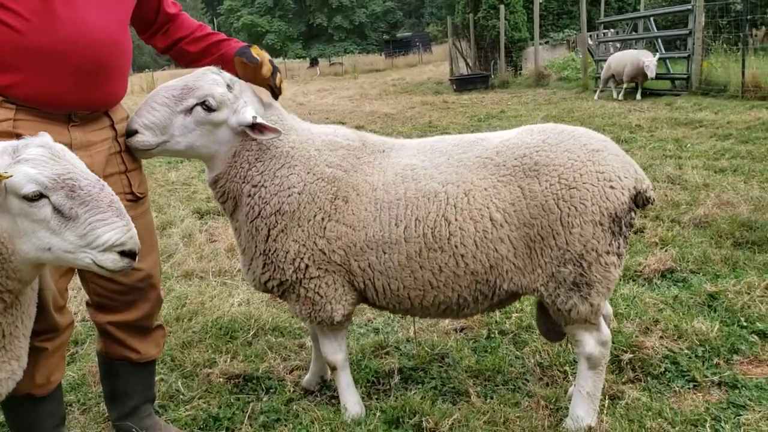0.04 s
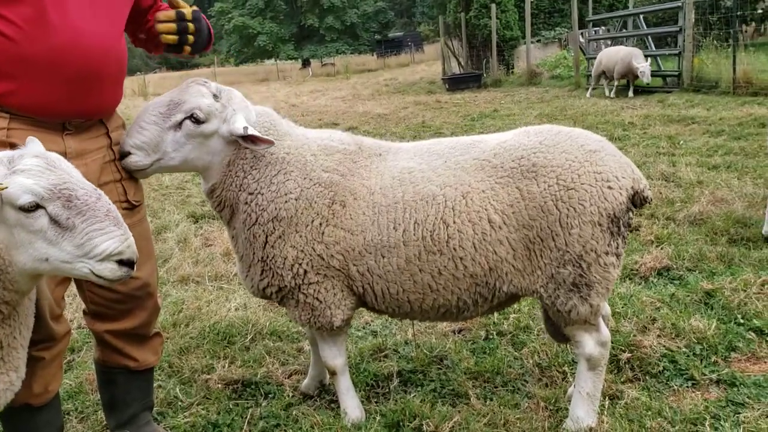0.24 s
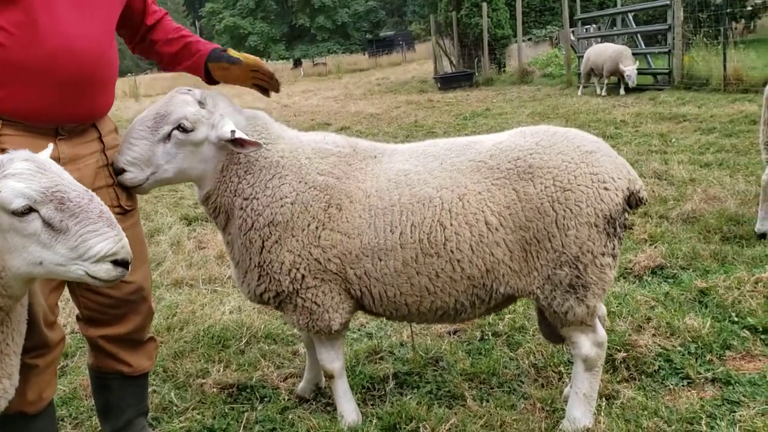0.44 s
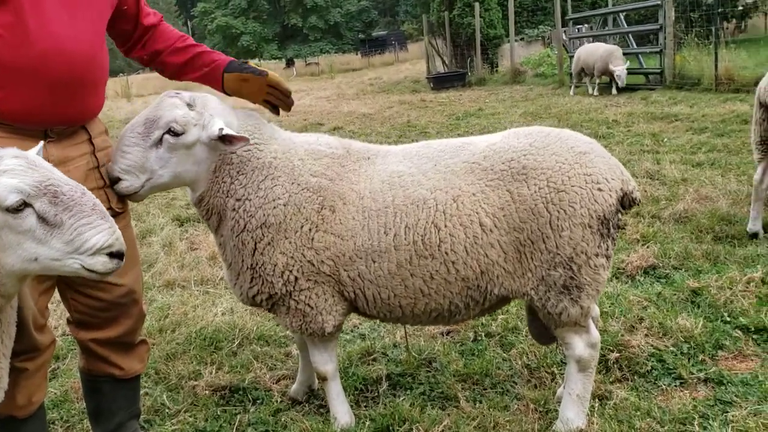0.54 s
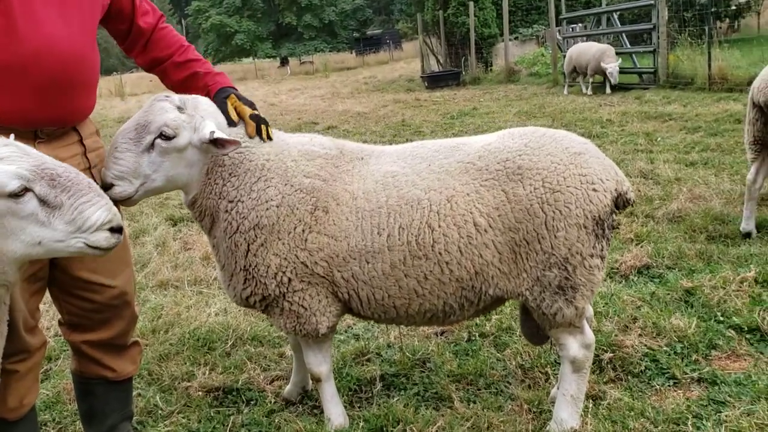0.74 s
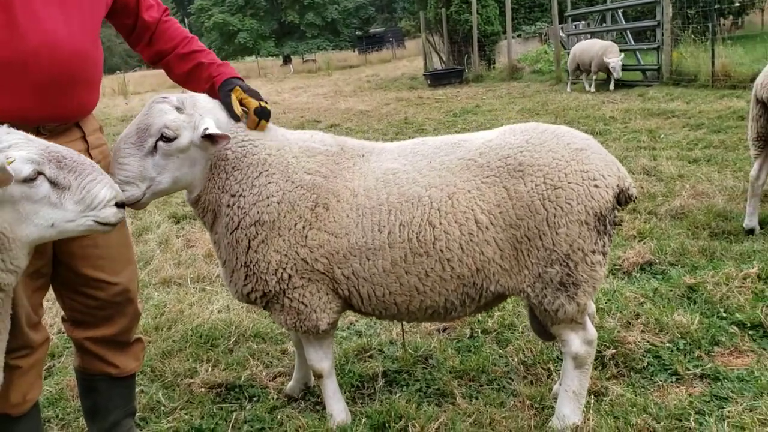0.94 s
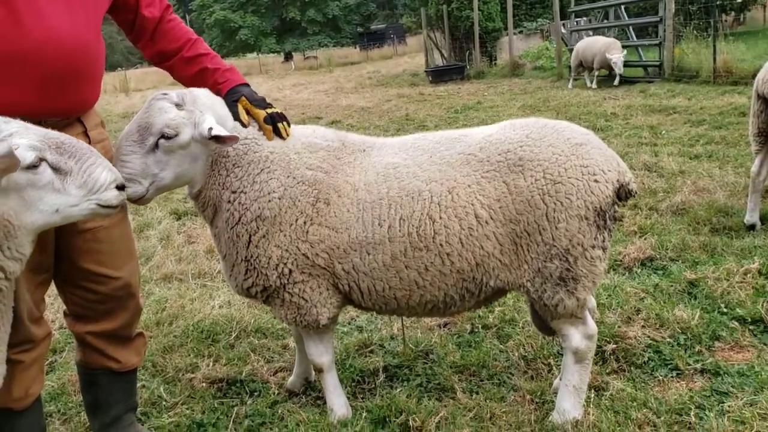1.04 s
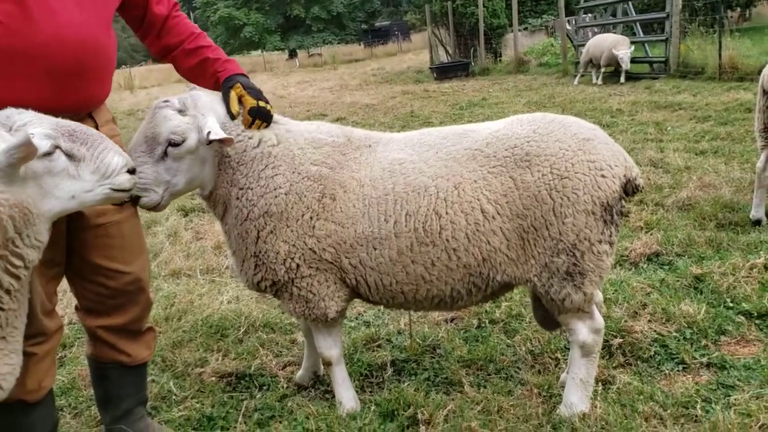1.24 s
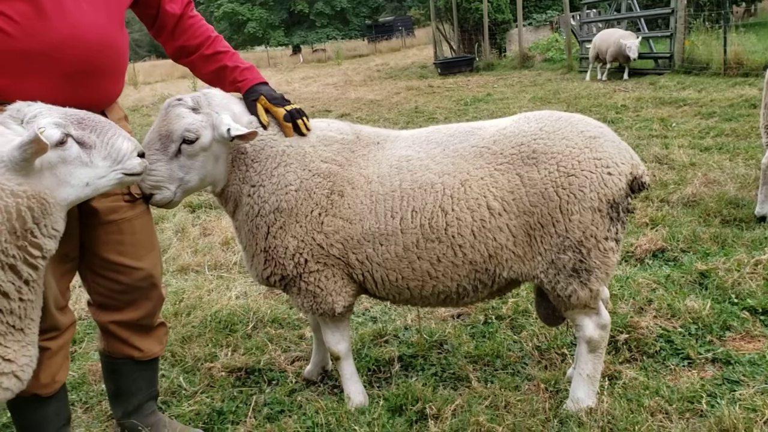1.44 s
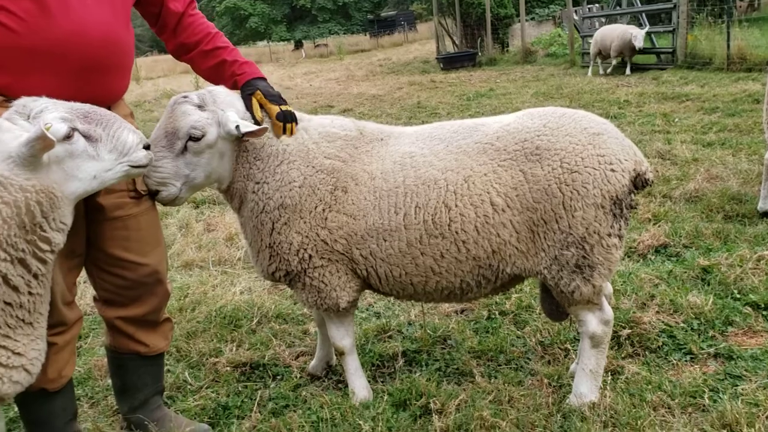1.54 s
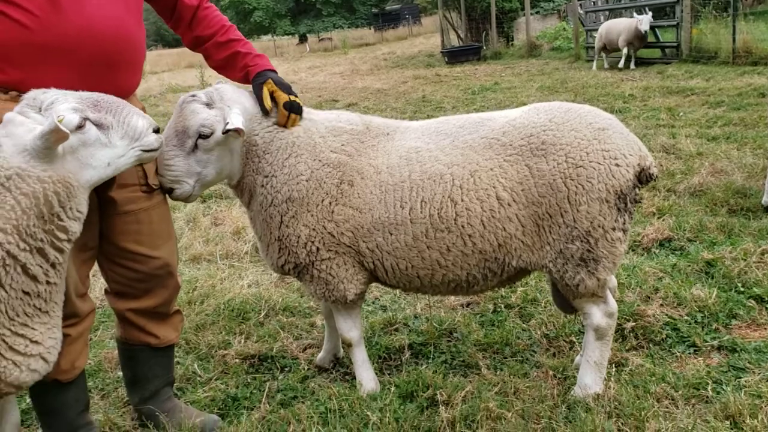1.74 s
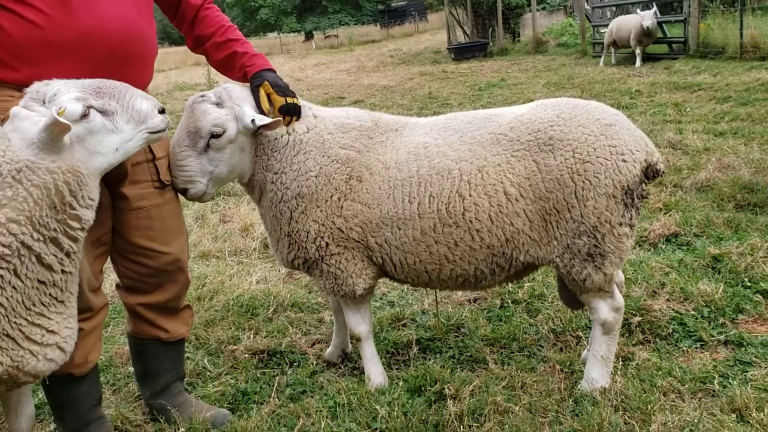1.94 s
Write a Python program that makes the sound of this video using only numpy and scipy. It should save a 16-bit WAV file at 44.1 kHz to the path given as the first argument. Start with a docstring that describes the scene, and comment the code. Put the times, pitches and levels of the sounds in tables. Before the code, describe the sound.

A sheep snorts twice, close up, with breathy nasal puffs over a faint low outdoor rumble.

```python
"""Pasture, two ports close to sheep. From the start a low rumble with two wavering tones drones far off under
the faint hiss of open air: coloured noise. A sheep snorts at about 0.15 s and again at 1.35 s: bursts of
turbulent noise ring the nose resonances, and slow breath trails off after each. Between and after them fall
faint nostril whistles and soft low stirs (narrow noise swells) and small ticks (dying sines)."""
import sys
import numpy as np
from scipy import signal
from scipy.fft import rfft, irfft
from scipy.io import wavfile

SR = 44100
rng = np.random.default_rng(int(sys.argv[2]) if len(sys.argv) > 2 else 0)


def pcm_store(signal):
    """Save signal as 16-bit PCM."""
    levels = np.round(np.clip(np.atleast_2d(signal), -1, 1) * 32767)
    wavfile.write(sys.argv[1], SR, levels.astype(np.int16).T)


def convert_level_to_amplitude(level_db):
    """Map a level in decibels to its linear amplitude factor."""
    exponent = np.asarray(level_db, float) / 20
    return 10 ** exponent


N = 88200  # samples, 2 s
F = np.fft.rfftfreq(N, 1 / SR)  # Hz
T = np.arange(N) / SR  # s


def read(table):
    """A (frequency [Hz], value) table at every frequency, interpolated over log frequency."""
    hz, value = np.array(table, float).T
    return np.interp(np.log(F + 1), np.log(hz + 1), value)


def ring(hz, width_hz):
    """Response of one resonance, gain 1 at the centre."""
    s = 1j * F
    return s * width_hz / (s * s + s * width_hz + hz * hz)


def noise(shape):
    """Noise of a given spectral shape, rms 1."""
    x = irfft(rfft(rng.standard_normal(N)) * shape, N)
    return x / x.std()


def walk(rate_hz):
    """Slow random drift, rms 1."""
    return noise(1 / (1 + (F / rate_hz) ** 2))


def noise_swells(rows, width_hz):
    """Short soft swells of narrow noise; rows: (time [s], centre [Hz], level [dB], length [s])."""
    out = np.zeros(N)
    for time_s, hz, level_db, length_s in rows:
        envelope = np.exp(-2 * ((T - time_s) / length_s) ** 2)
        out += convert_level_to_amplitude(level_db) * envelope * noise(ring(hz, width_hz) ** 2)
    return out


def ports(shared, unshared, balance, phase, likeness):
    """Two ports hear one sound with their own level and phase, and an unshared part of opposite sign."""
    like = np.clip(read(likeness), 0, 1)
    common = rfft(shared) * np.sqrt((1 + like) / 2)
    opposed = rfft(unshared) * np.sqrt((1 - like) / 2)
    tilt = convert_level_to_amplitude(read(balance) / 2) * np.exp(0.5j * phase)  # half of the difference to each port
    left = irfft((common + opposed) * tilt, N)
    right = irfft((common - opposed) / tilt, N)
    return np.array([left, right])


def far_air():
    """Far rumble and air hiss: coloured noise swelling slowly as one, with two wavering tones in the rumble."""
    # air colour: (frequency [Hz], density [dB, relative])
    air_colour = [(20, -47), (40, -16), (60, -4.5), (85, -6.5), (130, -6.5), (190, -16), (260, -24.5),
                  (550, -34), (1300, -37.5), (2200, -44), (4000, -38.5), (9500, -41), (13000, -44),
                  (16000, -36)]
    # left over right: (frequency [Hz], level [dB])
    air_balance = [(60, 2), (200, -4), (700, 2), (3000, -15.5), (8000, -3.5), (15000, -5.5)]
    # likeness of the ports: (frequency [Hz], likeness [0-1])
    air_like = [(30, 0.33), (80, 0.92), (300, 0.78), (1400, 0.13), (8000, 0.037)]
    # tones: (centre [Hz], width of each of two cascaded resonances [Hz], level [dB, relative])
    drone_tones = [(84.2, 15.6, -2.5), (223.3, 3.36, -16)]
    # overall gain: (time [s], level [dB])
    air_level = [(0.0, -65), (0.06, -60), (2.0, -61.5)]
    gain_db, swell_db, swell_rate_hz = -0.5, 1.67, 1.5

    octave = np.log2(F + 1)
    edges = np.clip(octave - 4, 0, 1) * np.clip(15 - octave, 0, 1)  # fades below 31 Hz and above 16.4 kHz
    colour = convert_level_to_amplitude(read(air_colour))
    gain = convert_level_to_amplitude(gain_db + swell_db * walk(swell_rate_hz))
    shared, unshared = [gain * irfft(rfft(noise(colour)) * edges, N) for _ in range(2)]
    for hz, width_hz, level_db in drone_tones:
        shared += convert_level_to_amplitude(level_db) * noise(ring(hz, width_hz) ** 2)
    level_db = np.interp(T, *np.array(air_level).T)
    return ports(shared, unshared, air_balance, 0, air_like) * convert_level_to_amplitude(level_db)


def breath_flow(part):
    """Strength of slow breath in one nose part (0 low nose .. 4 throat), dB interpolated over time."""
    # slow breath between puffs: (time [s], level [dB], then offsets for
    # middle [dB], upper [dB], nostril hiss [dB], throat [dB])
    breath_rows = [(0, -58, -4.5, -4.5, -1, 1), (.12, -69.5, -3, -2, -8, 1), (.25, -46.5, -1, -5.5, -11, 3),
                   (.36, -61, 5, -0.5, -15, -1.5), (.46, -59.5, 3.5, -2, 0.5, -2),
                   (.56, -69, 4.5, -5, -5, 10.5), (.78, -78.5, 2.5, 9.5, -1, -11),
                   (.96, -83.5, 5, 2, 11.5, 0), (1.12, -90, 10, 18, 16, 2), (1.27, -71.5, 0, 6.5, 9, -28),
                   (1.45, -52.5, 1.5, -5, -26, 6), (1.54, -56, -1, -2, -4, 2.5),
                   (1.64, -66.5, 4, 2, -2, -1), (1.79, -69.5, 1, 6, -12, 4), (1.83, -66, 1, 5.5, 2.5, 5.5),
                   (2, -67.5, -2.5, 0, -1, 0)]
    times_s = [row[0] for row in breath_rows]
    levels_db = [row[1] + (row[1 + part] if part else 0) for row in breath_rows]
    return convert_level_to_amplitude(np.interp(T, times_s, levels_db))


def puff_flow(part):
    """Strength of the puffs in one nose part: each rises fast and dies away; powers add."""
    # puffs: (time of full rise [s], level [dB], then offsets for
    # middle [dB], upper [dB], nostril hiss [dB], throat [dB]; decay t60 [s])
    puff_rows = [(0.092, -68, 0, 5, 5, -20, 0.9), (0.146, -37.5, 3, 4.5, 7.5, -6, 0.18),
                 (0.161, -36.5, 1, 4.5, 3, 4, 0.15), (0.176, -34, 7, 4, -15, 7, 0.13),
                 (0.199, -39.5, 2.5, -3, -26, 1.5, 0.16), (0.257, -49, -22, 2.5, -2.5, -23, 0.33),
                 (0.815, -59, 4, 7, -3, -1, 0.13), (0.826, -60, -12, -10, -26, 4, 0.5),
                 (1.192, -68.5, 4, 3, -22, -7, 0.51), (1.287, -58, 2, 4, 8, -7, 0.67),
                 (1.341, -40.5, 4.5, 5, 7, -3, 0.095), (1.351, -47.5, 5, 8.5, -10, -10, 0.17),
                 (1.386, -38, 1.5, 1.5, -2, -1, 0.29), (1.427, -34, -1, -2, -1.5, -2, 0.067),
                 (1.481, -48, 2, 0, 1, 1, 0.13), (1.803, -71, 9, 9, -3, 3, 0.2)]
    rise_s = 0.005
    power = np.zeros(N)
    for row in puff_rows:
        level_db = row[1] + (row[1 + part] if part else 0)
        age_s = np.maximum(T - row[0] + rise_s, 0)
        shape = np.minimum(age_s / rise_s, 1) ** 2 * convert_level_to_amplitude(-60 * age_s / row[-1])
        power += (convert_level_to_amplitude(level_db) * shape) ** 2
    return np.sqrt(power)


def nose_air():
    """Turbulent air rings the nose; returns spectra-shaped puffs and breath, each (shared, unshared)."""
    # resonances in five parts: low nose, middle, upper, nostril hiss, throat; each
    # (centre [Hz], width of each of two cascaded stages in a puff [Hz], puff level [dB], breath level [dB])
    nose_parts = [
        [(1097, 73, 1, 1), (1282, 136, -0.5, -7.5), (1534, 356, 2, -2.5), (1857, 110, -1, -9)],
        [(2240, 456, -5.5, -9.5), (2970, 320, -3.5, -7.5), (3306, 250, -6, -9.5), (3681, 242, 3.5, -10),
         (3986, 1370, -7.5, -8.5)],
        [(5020, 190, -13.5, -13), (5710, 900, -8, -13.5), (7460, 750, -12, -13)],
        [(10370, 5600, -29, -25), (11100, 5100, -16, -24.5), (12570, 1400, -9.5, -14.5),
         (14100, 3900, -22, -26)],
        [(358, 210, -20, -22), (642, 164, -14, -32.5), (804, 60, -3, -9.5), (950, 290, -9.5, -15)],
    ]
    turbulence_db, turbulence_hz = 1.6, 120  # flutter common to a part
    wander_db, wander_hz = 1.4, 25  # each resonance also swells and fades alone
    breath_widening = 1.88  # resonances are broader in slow breath
    gain_db, open_hz, open_width_hz = 15.5, 2820, 18700  # wide band passed by the open nostrils

    puffs, breath = np.zeros((2, 2, len(F)), complex)
    for part, resonances in enumerate(nose_parts):
        flutter = convert_level_to_amplitude(turbulence_db * walk(turbulence_hz))
        puff_strength, breath_strength = puff_flow(part), breath_flow(part)
        for hz, width_hz, puff_db, breath_db in resonances:
            wander = flutter * convert_level_to_amplitude(wander_db * walk(wander_hz))
            puff_air = puff_strength * wander * rng.standard_normal((2, N))
            breath_air = breath_strength * wander * rng.standard_normal((2, N))
            puffs += convert_level_to_amplitude(puff_db) * ring(hz, width_hz) ** 2 * rfft(puff_air)
            breath += convert_level_to_amplitude(breath_db) * ring(hz, width_hz * breath_widening) ** 2 * rfft(breath_air)
    nostrils = convert_level_to_amplitude(gain_db) * ring(open_hz, open_width_hz)
    return irfft(puffs * nostrils, N), irfft(breath * nostrils, N)


def nostril_whistles():
    """Breathy nostril whistles, high and low: narrow noise swells."""
    # (time [s], centre [Hz], level [dB], length [s])
    whistle_rows = [(.45, 10200, -72, .03), (1.543, 10100, -62, .014), (.855, 830, -68, .035),
                    (1.834, 1100, -63, .018), (1.877, 1100, -63, .02), (1.945, 1150, -66, .03)]
    return noise_swells(whistle_rows, width_hz=130)


def low_stirs():
    """Soft low stirs, perhaps hooves in the grass: narrow noise swells."""
    # (time [s], centre [Hz], level [dB], length [s])
    stir_rows = [(.49, 310, -71, .03), (1.07, 330, -70, .07)]
    return noise_swells(stir_rows, width_hz=113)


def dry_ticks():
    """Small dry ticks: sines that rise within one cycle and die away exponentially."""
    # (time [s], level [dB], frequency [Hz], decay t60 [s])
    tick_rows = [(.8122, -43, 3650, .03), (1.287, -54, 11000, .008), (1.31, -58, 10000, .008),
                 (1.6602, -37, 1450, .008)]
    out = np.zeros(N)
    for time_s, level_db, hz, t60_s in tick_rows:
        age_s = np.maximum(T - time_s, 0)
        envelope = np.minimum(age_s * hz, 1) * convert_level_to_amplitude(level_db - 60 * age_s / t60_s)
        out += envelope * np.sin(2 * np.pi * hz * age_s)
    return out


def sheep():
    """Near sheep at the two ports; slow breath, whistles, stirs and ticks have their own balance."""
    # puffs, left over right: (frequency [Hz], level [dB])
    puff_balance = [(60, 6), (110, 0), (380, 0), (700, -2), (1290, 8.5), (2380, -3.5), (4400, 1), (8120, 4),
                    (15000, -6)]
    # breath and small sounds, left over right: (frequency [Hz], level [dB])
    breath_balance = [(300, 0.5), (1300, -0.5), (3500, -4.5), (8000, 3), (15000, -11)]
    # left against right, unwrapped below: (frequency [Hz], phase [rad])
    near_phase = [(300, -0.2), (1290, -1), (1810, -2.5), (3700, -2), (4740, -3.0), (6370, 0.5), (7750, 8),
                  (8610, 4.5), (9560, 10.5), (11500, 1), (12400, 4.5), (13300, -7.5), (14600, -14.5),
                  (15800, 9.5)]
    # likeness of the ports: (frequency [Hz], likeness [0-1])
    near_like = [(200, 1), (1000, 0.86), (3000, 0.43), (6000, 0.11), (12000, 0.8)]

    hz, phase_rad = np.array(near_phase).T
    phase = read(np.transpose([hz, np.unwrap(phase_rad)]))
    puffs, breath = nose_air()
    small = nostril_whistles() + low_stirs() + dry_ticks()
    snort = ports(puffs[0], puffs[1], puff_balance, phase, near_like)
    soft = ports(breath[0] + small, breath[1], breath_balance, phase, near_like)
    return snort + soft


def scene():
    """The near sheep over the far air."""
    return far_air() + sheep()


def band_limit(x):
    """A steep low-pass at the top of the band."""
    return signal.sosfilt(signal.butter(12, 15850, fs=SR, output="sos"), x)


def record(dry):
    """The recorder cuts the top steeply above 15.78 kHz."""
    top_cut = signal.ellip(8, 0.2, 70, 15780, fs=SR, output="sos")  # ripple 0.2 dB, stop band -70 dB
    mix = signal.sosfilt(top_cut, dry)
    return band_limit(mix)


dry = scene()
out = record(dry)
pcm_store(out)
```